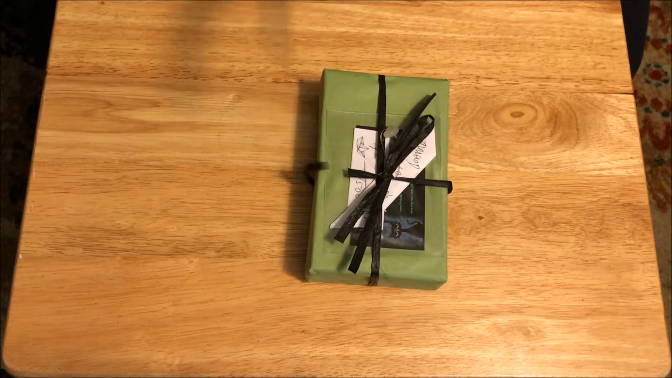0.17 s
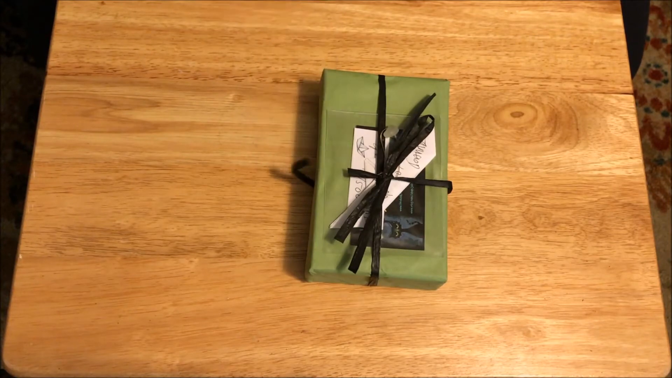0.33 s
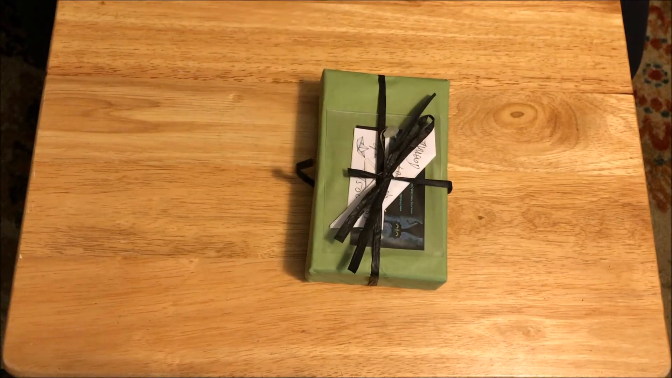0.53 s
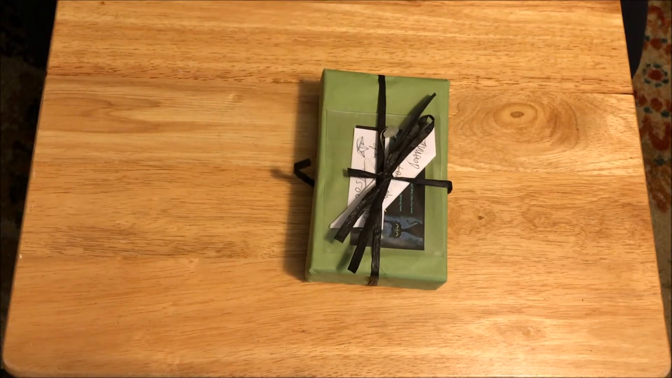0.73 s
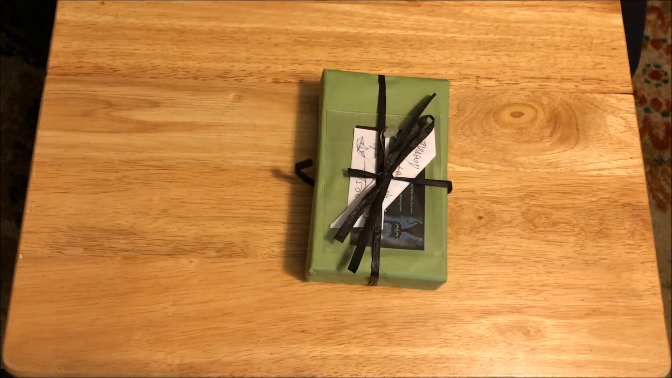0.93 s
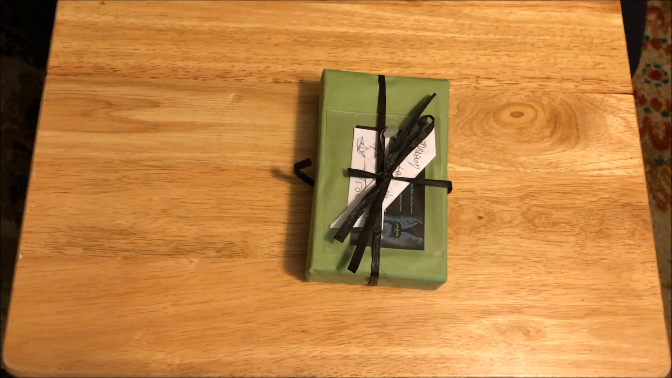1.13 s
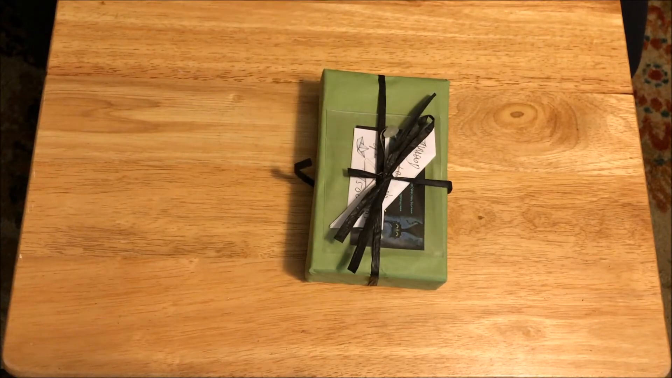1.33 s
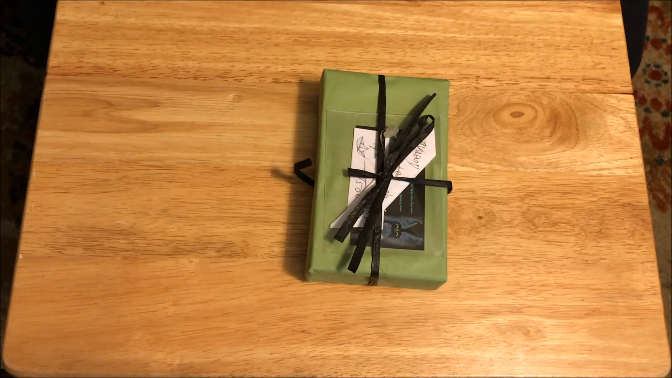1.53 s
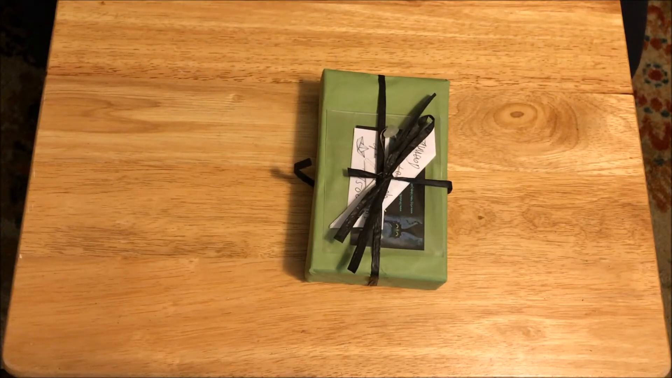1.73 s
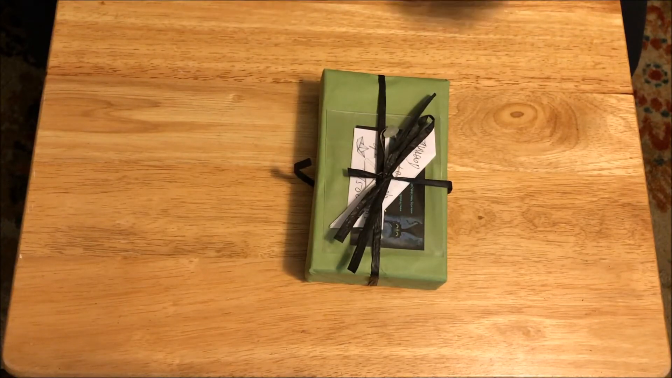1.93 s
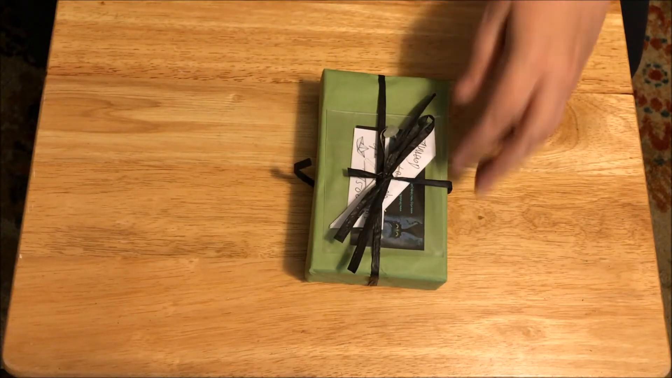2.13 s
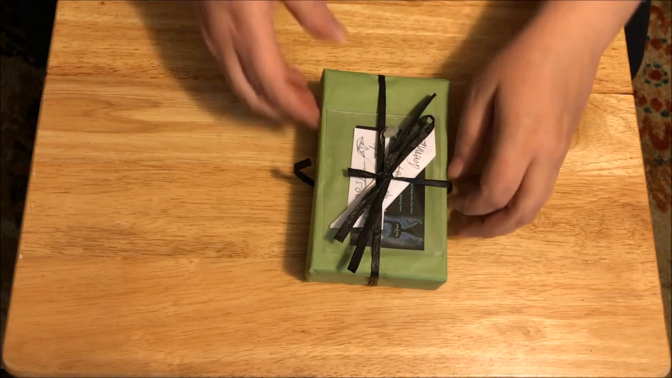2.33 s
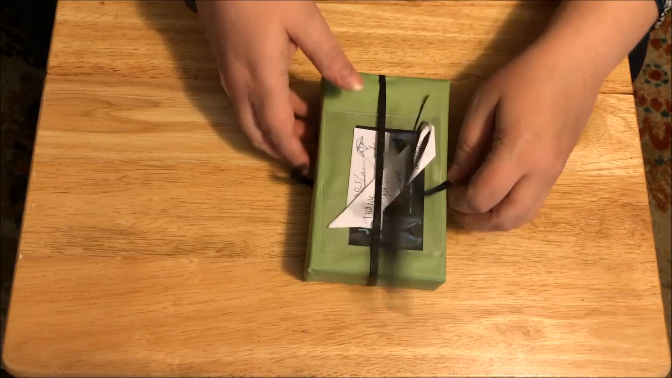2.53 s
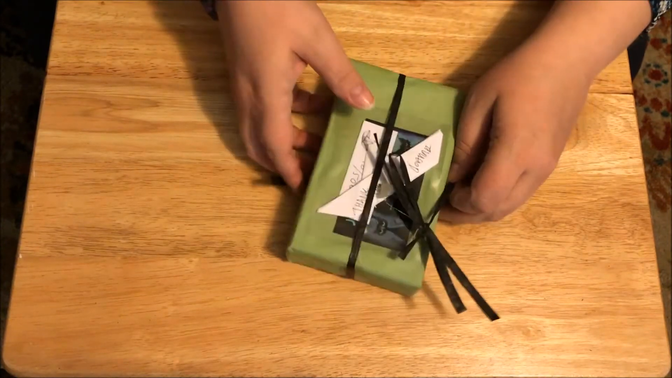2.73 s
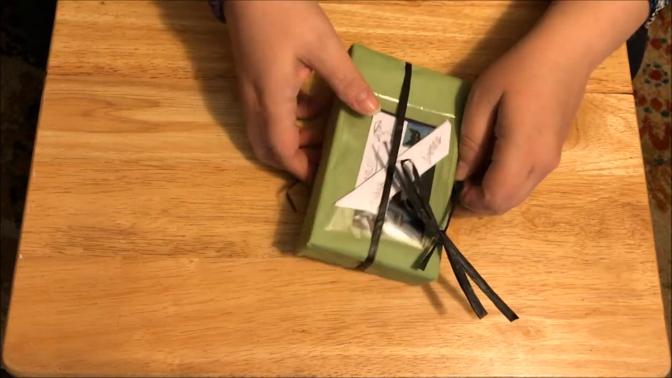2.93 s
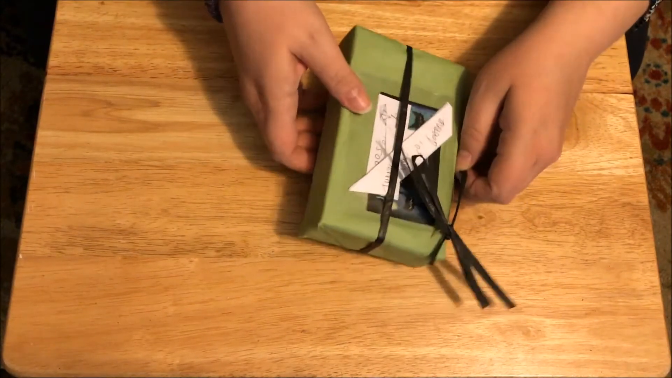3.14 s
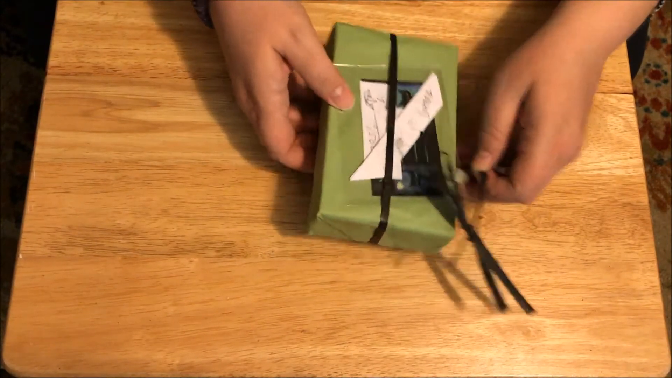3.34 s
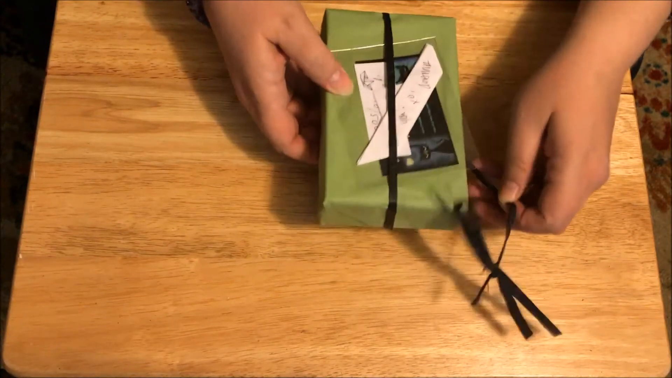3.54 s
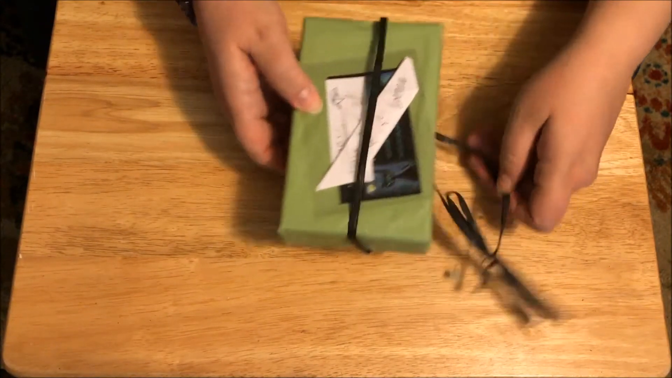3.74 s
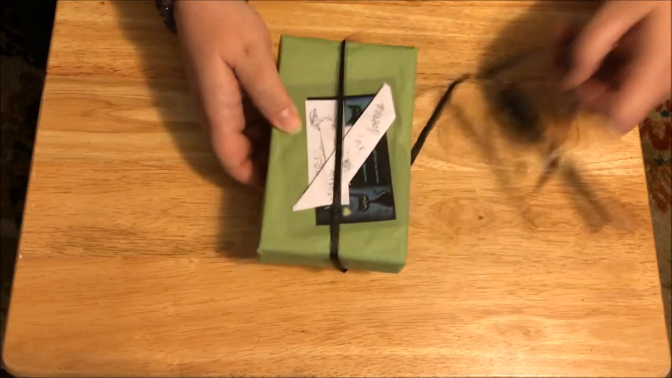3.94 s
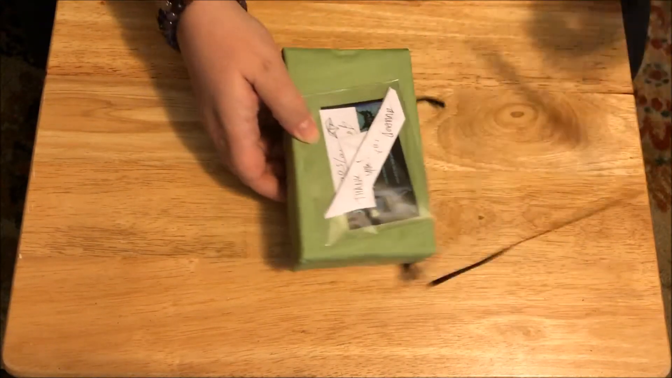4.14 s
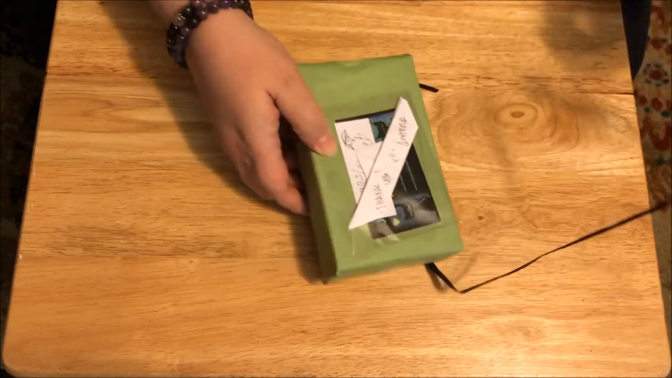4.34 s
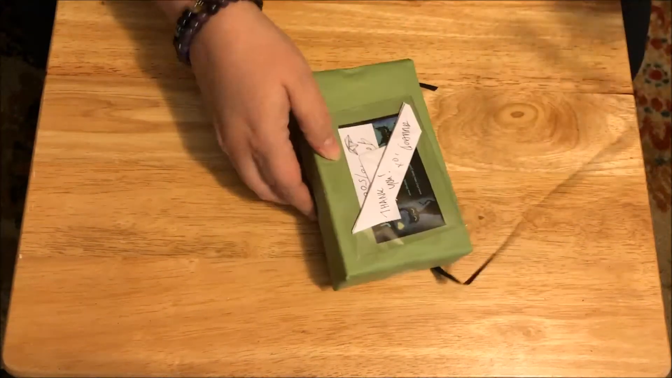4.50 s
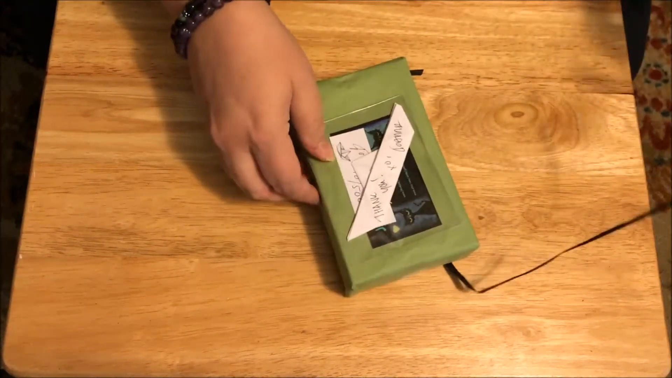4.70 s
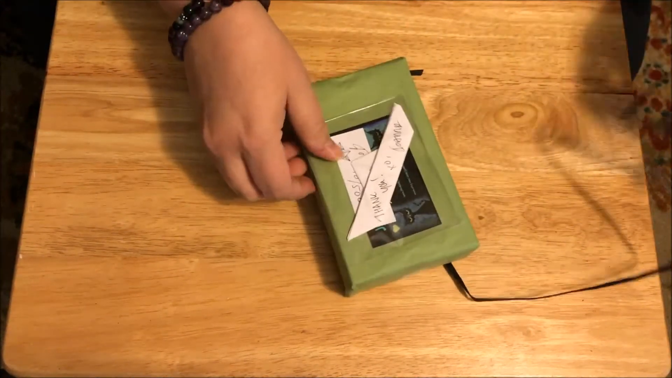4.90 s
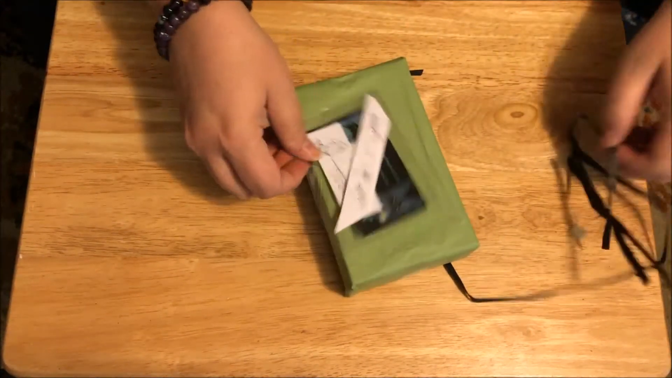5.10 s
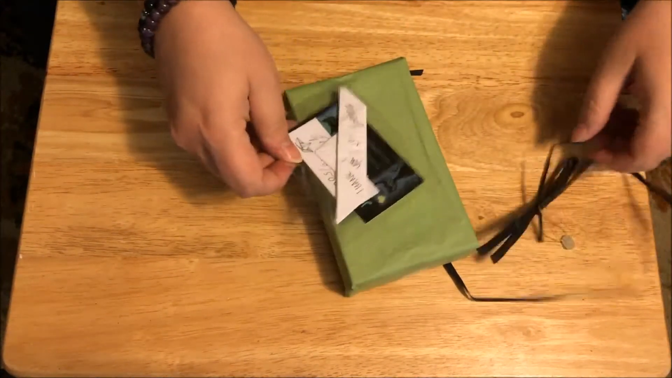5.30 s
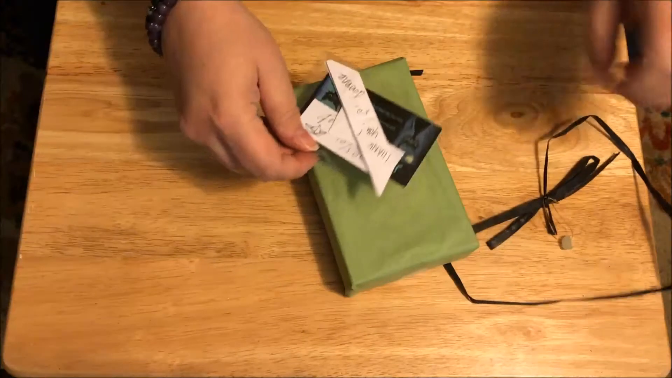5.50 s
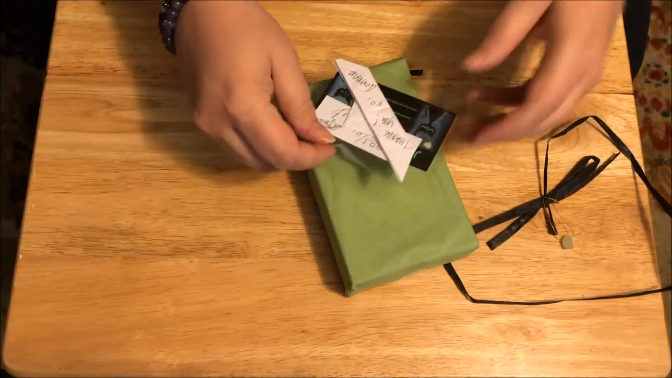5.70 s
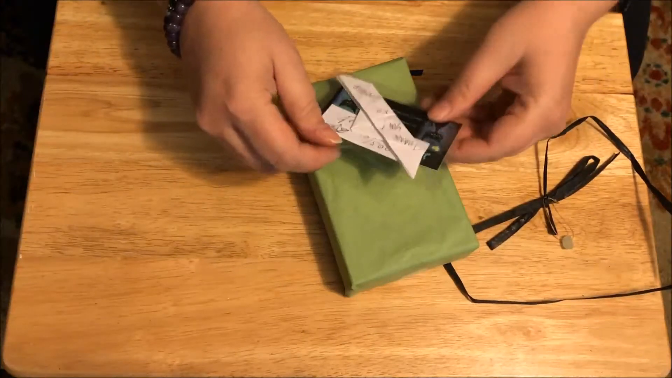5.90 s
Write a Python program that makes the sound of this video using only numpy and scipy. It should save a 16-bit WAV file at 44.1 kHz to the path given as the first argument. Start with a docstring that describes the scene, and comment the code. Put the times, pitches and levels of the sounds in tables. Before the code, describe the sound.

Scissors snip a ribbon and clatter onto a wooden table, then a paper-wrapped box is handled with rustles and soft thumps.

```python
"""First comes one sharp snip: scissor blades scrape and bite through a ribbon on a paper-wrapped box.
The scissors drop onto a wooden table, where the steel rings and the handles clatter. Hands turn the
hollow box, which thumps on the table. Ribbon and paper rub and rustle, creases snap, and the bow's
hard knot patters on the wood. Behind it all is a small, quiet room with a faint hum and hiss."""
import sys
import numpy as np
from scipy import signal
from scipy.fft import rfft, irfft, next_fast_len
from scipy.io import wavfile
from scipy.ndimage import uniform_filter1d, map_coordinates

SR = 44100
rng = np.random.default_rng(int(sys.argv[2]) if len(sys.argv) > 2 else 0)


def persist_wave(psi):
    """Save psi, clipped to +-1, as 16-bit WAV."""
    counts = np.round(np.clip(psi, -1, 1) * 32767).astype(np.int16)
    wavfile.write(sys.argv[1], SR, np.atleast_2d(counts).T)


N = 262836

# A fade time (t60) is how long a sound takes to fall by 60 dB.
# The blades touch during the cut: (time [s], peak level [dB], fade time [s])
BLADE_TOUCHES = [(.0085, -35, 0.014), (0.0114, -29.5, .008), (0.016, -19.5, 0.014), (0.019, -0.5, .0025),
                 (0.0225, -17, .006), (0.0303, -27, 0.0037)]
# Broad tones of the closing blades: (pitch [Hz], width [Hz], level [dB])
BLADE_TONES = [(2160, 620, -15), (4184, 990, -1.5), (5620, 700, -1), (8500, 580, 1.5), (12900, 2400, -13),
               (14070, 850, -14)]
# The dropped scissors bounce: (time [s], level [dB], fade time [s], treble cutoff [Hz])
SCISSOR_HITS = [(1.5222, -12, 0.0054, 19850), (1.5231, -15.5, 0.0029, 20240),
                (1.5253, -14.5, 0.0082, 19940), (1.531, -11.5, .02, 30340), (1.541, -13, .02, 9450),
                (1.552, -25.5, .02, 7940), (1.562, -24, .03, 30020), (1.6285, -17.5, 0.056, 5570),
                (1.639, -23.5, 0.014, 5490)]
# Ringing tones of the steel: (pitch [Hz], level [dB], fade time [s])
STEEL_TONES = [(1674, -5.5, 0.13), (2277, 2.5, 0.044), (2316, -3, 0.047), (2482, -6, 0.04),
               (2702, -3, 0.085), (3187, -8, 0.064), (2972, -8, 0.07), (3554, -1, 0.08), (3595, 1, 0.14),
               (4050, 14, 0.079), (4133, 3, 0.09), (4170, -53, .06), (4900, -15, 0.078), (5220, -8, 0.06),
               (5850, -15, 0.061), (6380, -19, 0.198), (9670, -15, 0.17)]
# Tone colour of handles hitting the table: (frequency [Hz], level [dB])
CLATTER_COLOUR = [(130, -51), (220, -33), (565, -21.5), (779, -31), (1740, -12.5), (1930, -22.5),
                  (2270, -12), (3350, -11.5), (4080, -10), (6030, -19), (15500, -25.5)]
# Blows on box and table: (time [s], box peak [dB], crack over box [dB], table over box [dB])
BOX_BLOWS = [(0.038, -40, -15.5, -41), (1.16, -52, -3, -2), (1.351, -51, -2, 2.5), (2.6, -46.5, -27, -18.5),
             (2.809, -42, 14, -23), (3.115, -31, -17, -15), (3.343, -51, 4, -14), (3.828, -42.5, 10.5, -19),
             (4.105, -55.5, 7.5, -7), (4.3629, -29.5, -11, -13), (4.703, -17.5, -13.5, -17),
             (4.743, -50, -18, -9), (5.039, -52.5, -1, -10.5)]
# Tones of the hollow box: (pitch [Hz], level [dB], fade time [s])
BOX_TONES = [(315, -9, .1), (350, 9, .018), (423.2, -13, .06), (587, -18, .045), (755, -18, .028),
             (1078.6, -19, .03)]
# Tones of the table top: (pitch [Hz], level [dB], fade time [s])
TABLE_TONES = [(76.03, -1.5, 0.076), (124.2, -4, 0.089), (164, -5, 0.11), (199, -4.5, .1),
               (267.6, -9, 0.12)]
# Paper and ribbon snap: (time [s], peak level [dB], middle over low [dB], high over low [dB])
CREASE_SNAPS = [(1.1614, -46, -8, 6), (1.9859, -49, 0, -18), (2.4804, -36, -10, -19), (2.581, -40, -4, 22),
                (2.7985, -28, 5, 8), (2.8013, -18.5, 9.5, 4.5), (2.806, -25, 1, -25.5),
                (2.9226, -40, 17, 21), (2.953, -39.5, 15, 7), (3.0716, -34.5, -15, 13),
                (3.1213, -35.5, -5, 1), (3.1444, -32.5, 2, 2.5), (3.2344, -37.5, -1, 15),
                (3.4064, -33.5, 5, 1), (3.69, -35.5, 14, 25), (3.761, -40, -2.5, -5.5),
                (3.8267, -15, 15, 9.5), (3.8323, -22.5, 8, -9), (3.9277, -34, 26, 6),
                (3.9396, -38, 21, 15.5), (4.0133, -39, 22, 24.5), (4.0586, -31.5, 0, 12.5),
                (4.1017, -37.5, 6, 10), (4.1103, -38, 5.5, 12), (4.4465, -41.5, 1.5, 1),
                (4.5049, -37, 23, 21), (4.593, -35, -11, 6), (4.7025, -34.5, 7, 3.5), (4.793, -39.5, 9, 18),
                (4.8468, -43, 8, 8), (4.7437, -43.5, -5, 18), (5.0359, -41, -11, 7), (5.1104, -24, 1, 14),
                (5.3717, -45, -1, 3.5), (5.5625, -35.5, 3.5, -4.5)]
# The paper's low, middle and high bands, one list each: (frequency [Hz], level [dB])
PAPER_BANDS = ([(400, -40), (700, 0.5), (1500, 4), (2500, -4), (4000, -55.5)], [(1500, -21), (2500, -5),
               (4500, -1), (7000, -4.5), (10000, -24)], [(4500, -24), (7000, -8), (9000, 7), (13000, -2),
               (16000, -2)])
# The knot hits the table: (time [s], peak level [dB])
KNOT_BOUNCES = [(5.2161, -18), (5.2362, -23), (5.2464, -26), (5.267, -27.5), (5.279, -33), (5.3118, -26.5)]
# Short tones of each bounce: (pitch [Hz], level [dB], fade time [s])
KNOT_TONES = [(1870, -6, .015), (3040, 0, .012), (4400, 1, .011), (5900, 5, .014), (8400, -3, .008)]
# Tone colour of the knot's click: (frequency [Hz], level [dB])
KNOT_COLOUR = [(470, -30), (800, -15), (3020, -8.5), (5080, -11.5), (5750, -4), (6350, -12), (15500, -23)]
# Hands, ribbon and box drag along: (time [s], middle band level [dB], brightness [dB])
DRAG_CURVE = [(2.33, -76.5, 8.5), (2.47, -75, -5), (2.6, -65.5, 0.5), (3.0, -65.5, -2), (3.15, -61.5, -3),
              (3.37, -67, 1), (3.77, -72.5, 8.5), (3.92, -61, -3), (4.02, -70, 12), (4.12, -81, 13),
              (4.4, -70.5, -0.5), (4.6, -63.5, 0), (4.8, -76.5, 3), (4.92, -76.5, -1.5),
              (5.06, -66.5, -7.5), (5.18, -71.5, -3), (5.25, -64.5, -8.5), (5.42, -68, 0),
              (5.65, -82, -2.5)]
# Quick swishes of noise; the one at 4.474 s is a brief, narrow mid-treble hiss:
# (time [s], rise [s], fall [s], middle band level [dB], outer bands' average over middle [dB])
QUICK_SWISHES = [(1.235, 0.013, .04, -68, -5.5), (1.35, 0.0066, 0.023, -63, -16),
                 (2.488, 0.024, 0.07, -61, 2.5), (2.77, 0.04, 0.015, -59.5, -1),
                 (3.151, 0.067, 0.028, -59, 4), (3.299, 0.04, 0.011, -70, 8.5),
                 (3.389, 0.0076, 0.011, -48.5, -2), (3.535, 0.061, .026, -52.5, 1.5),
                 (3.61, 0.058, .017, -64.5, -1), (3.7, 0.0084, .041, -59, -4),
                 (4.04, 0.06, 0.036, -61.5, -0.5), (4.474, .016, 0.016, -52, -17.5),
                 (4.509, 0.013, 0.028, -54, -6.5), (4.696, 0.037, 0.019, -54, 1.5),
                 (5.101, .057, 0.026, -62.5, 4), (5.28, .052, 0.039, -52, -7.5),
                 (5.44, 0.021, 0.017, -74, 11.5)]
# Tone colour of the rubbed box's rumble: (frequency [Hz], level [dB])
RUMBLE_COLOUR = [(200, -34), (320, 7.5), (420, -1), (560, -2.5), (750, -41.5)]
# How loud that rumble is: (time [s], level [dB])
RUMBLE_CURVE = [(1.82, -78), (1.94, -65), (2.3, -69), (2.56, -63.5), (3.15, -64.5), (3.4, -78), (4.3, -76),
                (4.62, -67), (4.85, -87), (5.06, -59), (5.25, -72.5), (5.5, -76)]
# How long the room echoes: (frequency [Hz], fade time [s])
ECHO_TIMES = [(200, 0.24), (1200, 0.52), (2500, .32), (5000, .27), (12000, 0.11)]
# Tone colour of the room's steady noise and hiss: (frequency [Hz], level [dB])
AIR_COLOUR = [(15, -44), (25, -10), (61, -9), (180, -18.5), (354, -21), (503, -30), (575, -25),
              (1020, -27.5), (1230, -27), (1840, -28.5), (2610, -35.5), (3250, -34), (7510, -41),
              (12500, -41), (16000, -45.5)]
# Hum of the mains power: (pitch [Hz], rms level [dB])
HUM_TONES = [(60, -72), (120, -80.5)]
# The microphone cuts deep bass and has a dip in the treble: (frequency [Hz], gain [dB])
MIC_COLOUR = [(20, -24), (45, -2), (8500, -0.5), (10400, -3), (12000, 1.5)]


def scissor_snip(bare_scrape_db=-24.5):
    """Short scrapes and the final bite stir the broad tones of the blades."""
    def blades(hz):
        return sum((-1) ** k * amp(db) * 1j * hz * width / (pitch ** 2 - hz ** 2 + 1j * hz * width)
                   for k, (pitch, width, db) in enumerate(BLADE_TONES))

    out = np.zeros(N)
    for s, db, t60 in BLADE_TOUCHES:
        scrape = burst(t60, rise=0.0011)
        add(out, s, at_peak(filtered(scrape, blades) + amp(bare_scrape_db) * scrape, db))
    return out


def scissor_drop(steel_db=-3):
    """Each hit rings the steel and clatters the handles; the two landings also shake the table top."""
    out = np.zeros(N)
    for s, db, t60, cutoff_hz in SCISSOR_HITS:  # each hit has its own treble cutoff
        hit = at_peak(ring(STEEL_TONES, scatter_db=np.sqrt(12), rise=0.00081), db + steel_db)
        add(hit, 0, at_peak(coloured(burst(t60, rise=0.00035), CLATTER_COLOUR), db))
        add(out, s, filtered(hit, lambda hz: 1 / (1 + 1j * hz / cutoff_hz) ** 2))
    for (s, *_), table_db in ((SCISSOR_HITS[0], -36), (SCISSOR_HITS[-2], -44)):
        add(out, s + 0.0118, at_peak(ring(TABLE_TONES[1:], scatter_db=7.5, rise=0.02), table_db))
    return out


def box_thumps():
    """Soft blows ring the hollow box and the table; landing on an edge adds a dull crack."""
    out = np.zeros(N)
    for s, db, crack_db, table_db in BOX_BLOWS:
        noise = rng.standard_normal(SR // 4)
        dull_noise = coloured(noise, [(400, -29), (800, -3), (1500, -6), (3000, -18.5), (8000, -47)])
        crack = at_peak(dull_noise * fade(t60=0.038, rise=0.00076), db + crack_db)
        box = at_peak(ring(BOX_TONES, scatter_db=3.5, rise=0.005), db)
        table = at_peak(ring(TABLE_TONES, scatter_db=3, rise=0.008), db + table_db)
        add(out, s, box + crack + table)
    return out


def paper_snaps(ticks_per_s=8):
    """A crease lets go with a brief burst of noise. Faint random ticks follow the drag's level."""
    out, drag_db = np.zeros(N), drag()[0]
    dice = rng.random((round(ticks_per_s * N / SR), 4))
    ticks = [(when * N / SR, drag_db[int(when * N)] + 19 - 12 * soft, 16 * middle - 4, 16 * high + 0.5)
             for when, soft, middle, high in dice]  # same columns as CREASE_SNAPS
    for s, db, middle_db, high_db in CREASE_SNAPS + ticks:
        t60 = 0.0068 * amp(0.1651 * (db + 40))  # bigger snaps last longer
        crack = burst(t60, rise=t60 / 12)
        snap = sum(at_peak(coloured(crack, band), band_db)
                   for band, band_db in zip(PAPER_BANDS, (0, middle_db, high_db)))
        add(out, s, at_peak(snap, db))
    return out


def knot_patter(ring_db=-11):
    """The bow's hard knot bounces on the table: dry clicks, each with a short ring."""
    out = np.zeros(N)
    for s, db in KNOT_BOUNCES:
        add(out, s, at_peak(coloured(burst(t60=0.012, rise=0.00036), KNOT_COLOUR), db))
        add(out, s, at_peak(ring(KNOT_TONES, scatter_db=8, rise=0.00072), db + ring_db))
    return out


def rustle(slips_per_s=1500, slip_share=0.3, swish_bright_db=2):
    """Rubbing hisses, tiny fibres slip and the box rumbles; quick swishes swell over the drag."""
    t = np.arange(N) / SR
    slipping = rng.random(N) < slips_per_s / SR
    slips = slipping * amp(3.5 * np.clip(rng.standard_normal(N), -2, 2)) * rng.standard_normal(N)
    grip_db = 1.8 * map_coordinates(rng.standard_normal(600), [t * 60])  # wavers 60 times a second
    rub = np.sqrt(slip_share) * unit_rms(slips) + np.sqrt(1 - slip_share) * rng.standard_normal(N)
    rub = patchy(amp(grip_db) * rub, depth_db=2)  # the contact wanders, so the colour shifts
    drag_db, bright_db = drag()
    gains = amp([drag_db - bright_db, drag_db, drag_db + 1 + bright_db])  # low, middle, high
    for s, rise, fall, db, outer_db in QUICK_SWISHES:
        swell = np.exp(-((t - s) / np.where(t < s, rise, fall)) ** 2)
        bands_db = [[db + outer_db - swish_bright_db], [db], [db + outer_db + swish_bright_db]]
        gains = np.hypot(gains, amp(bands_db) * swell)
    rumble = (t > RUMBLE_CURVE[0][0]) * amp(curves(RUMBLE_CURVE)[0]) * coloured(rub, RUMBLE_COLOUR)
    return rumble + sum(gain * coloured(rub, band) for band, gain in zip(PAPER_BANDS, gains))


def drag():
    """Level and brightness of the dragging in dB; silent before it starts and after it ends."""
    level_db, bright_db = curves(DRAG_CURVE)
    t = np.arange(N) / SR
    moving = (t > DRAG_CURVE[0][0]) & (t < DRAG_CURVE[-1][0])
    return np.where(moving, level_db, -120), bright_db


def room_echo(x, delay_s=0.0052):
    """Each frequency of the echo dies at its own speed; each quarter second gets its own tail."""
    out, step = np.zeros(N + SR), SR // 4
    for start in range(0, N, step):
        hz, t, spectrum = signal.stft(rng.standard_normal(SR // 2), SR, nperseg=256)
        dying = amp(-60 * t / value_at(ECHO_TIMES, hz)[:, None])
        tail = signal.istft(spectrum * dying, SR, nperseg=256)[1]
        echo = signal.fftconvolve(x[start:start + step], tail / np.linalg.norm(tail))
        add(out, start / SR + delay_s, echo)
    return out[:N]


def background(air_db=-63, early_db=-62.5, early_end_s=0.425):
    """Steady room noise, mains hum and microphone hiss; the hiss starts louder, then steps down."""
    t = np.arange(N) / SR
    hiss = coloured(rng.standard_normal(N), [(100, -11), (1000, -0.5), (16000, -6.5)])
    early_hiss = amp(early_db) * (t < early_end_s) * hiss
    hum = sum(amp(db) * np.sqrt(2) * np.sin(2 * np.pi * hz * t) for hz, db in HUM_TONES)
    return amp(air_db) * coloured(rng.standard_normal(N), AIR_COLOUR) + early_hiss + hum


def ring(tones, scatter_db, rise):
    """A struck object: fading tones, each a little louder or softer by chance."""
    t = np.arange(SR // 4) / SR
    return sum(amp(db + rng.normal(0, scatter_db)) * np.sin(2 * np.pi * hz * t) * fade(t60, rise)
               for hz, db, t60 in tones)


def burst(t60, rise):
    """A dying puff of noise, evened out from bass to treble so it has no colour of its own."""
    spectrum = rfft(rng.standard_normal(4096) * fade(t60, rise)[:4096])
    return irfft(spectrum / uniform_filter1d(np.abs(spectrum), size=60))[:3072]


def fade(t60, rise):
    """A quick rise, then a fall of 60 dB every t60 seconds."""
    t = np.arange(SR // 4) / SR
    return amp(-60 * t / max(t60, 0.001)) * (1 - np.exp(-t / rise))


def patchy(x, depth_db):
    """Makes random patches of time and frequency louder or softer."""
    spectrum = signal.stft(x, nperseg=256)[2]
    patches = uniform_filter1d(rng.standard_normal(spectrum.shape), size=9, axis=0)
    patches = uniform_filter1d(patches, size=10, axis=1)
    return signal.istft(spectrum * amp(depth_db * unit_rms(patches)), nperseg=256)[1][:N]


def coloured(x, points):
    """Shapes x with (frequency [Hz], level [dB]) points, then scales it to rms 1."""
    return unit_rms(filtered(x, lambda hz: amp(value_at(points, hz))))


def filtered(x, response):
    """Multiplies each frequency in x by response(hz)."""
    size = next_fast_len(x.shape[-1] + 2048)
    return irfft(rfft(x, size) * response(np.fft.rfftfreq(size, 1 / SR)), size)[..., :x.shape[-1]]


def value_at(points, hz):
    """Reads between (frequency [Hz], value) points on a log frequency scale."""
    freqs, values = np.transpose(points)
    return np.interp(np.log(hz + 1), np.log(freqs + 1), values)


def curves(rows):
    """Turns each column after the time into one value per sample."""
    times, *columns = np.transpose(rows)
    return [np.interp(np.arange(N) / SR, times, column) for column in columns]


def add(track, s, sound):
    """Mixes a sound in at s seconds."""
    part = track[round(s * SR):][:len(sound)]
    part += sound[:len(part)]


def at_peak(x, db):
    """Scales x so its peak is at db."""
    return amp(db) * x / np.abs(x).max()


def unit_rms(x):
    """Scales x to an average strength (rms) of 1."""
    return x / np.sqrt(np.mean(x ** 2) + 1e-20)


def amp(db):
    """Turns dB into a multiplier."""
    return 10 ** (np.asarray(db) / 20)


def scene():
    """Mixes it all. The scissors land farther away, so their fall gets the most echo."""
    cut, fall, thumps = scissor_snip(), scissor_drop(), box_thumps()
    wrapping = paper_snaps() + knot_patter()
    echo = room_echo(amp(-15) * cut + amp(-7) * fall + amp(-12) * thumps + amp(-9) * wrapping)
    return (cut + fall + thumps + wrapping + echo + rustle() + background())[None]


def record(dry):
    """The microphone colours the sound and keeps nothing above 15750 Hz."""
    return filtered(dry, lambda hz: amp(value_at(MIC_COLOUR, hz)) * (hz < 15750))


dry = scene()
out = record(dry)
persist_wave(out)
```